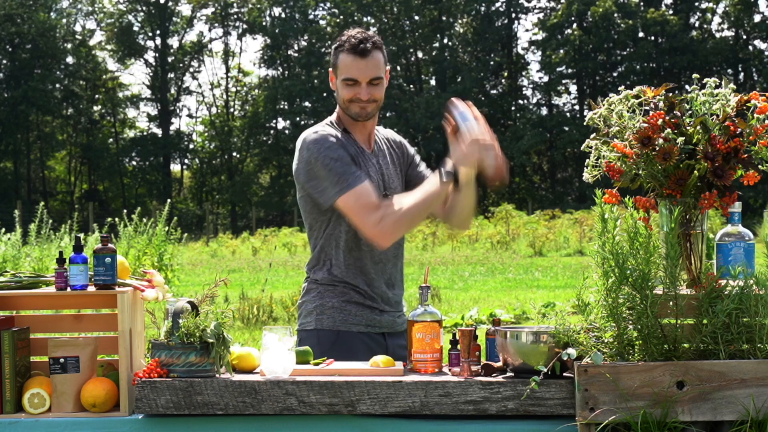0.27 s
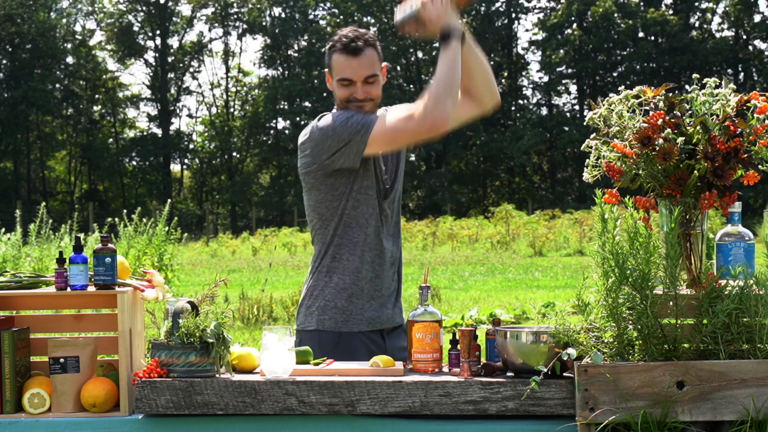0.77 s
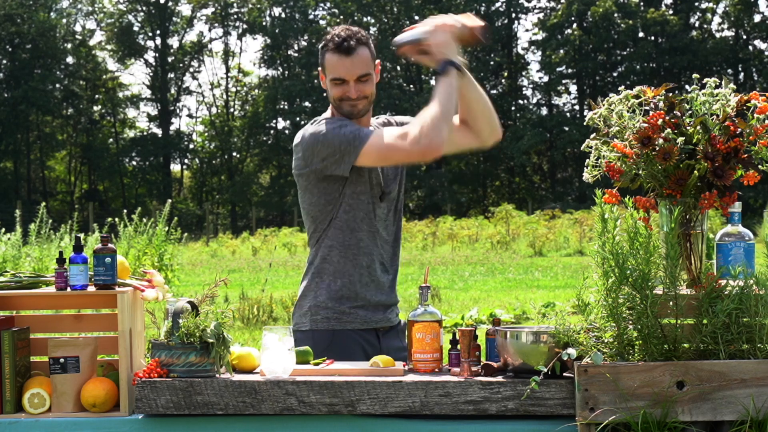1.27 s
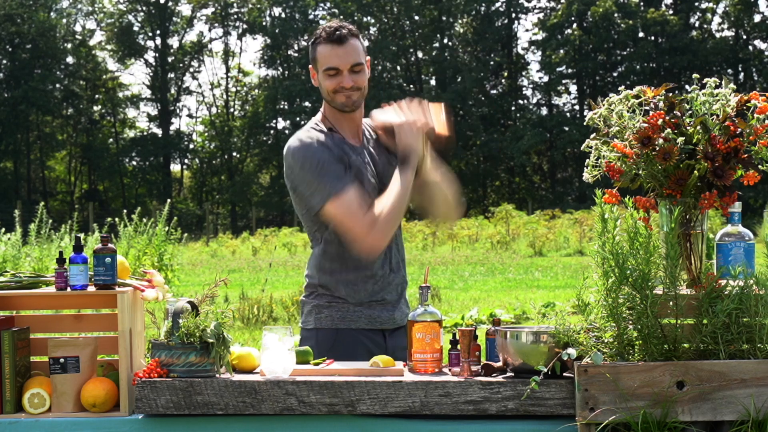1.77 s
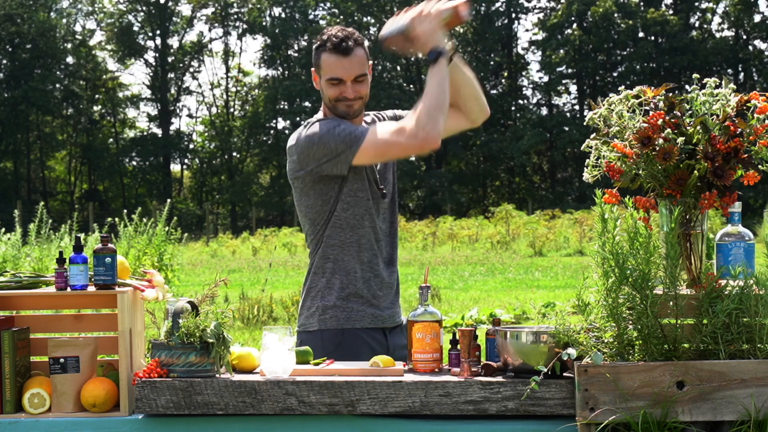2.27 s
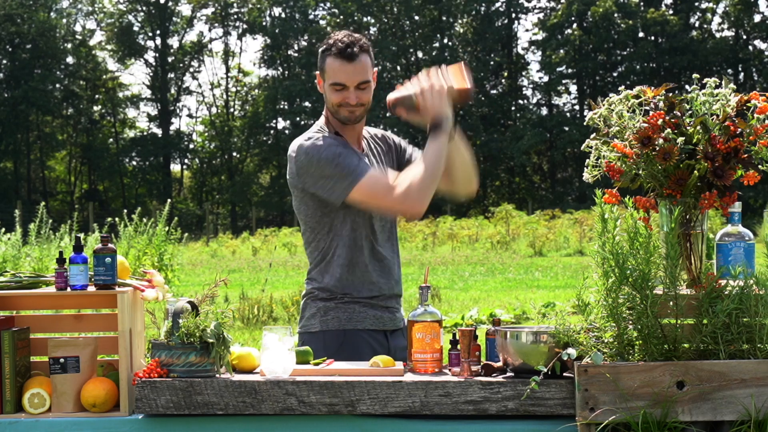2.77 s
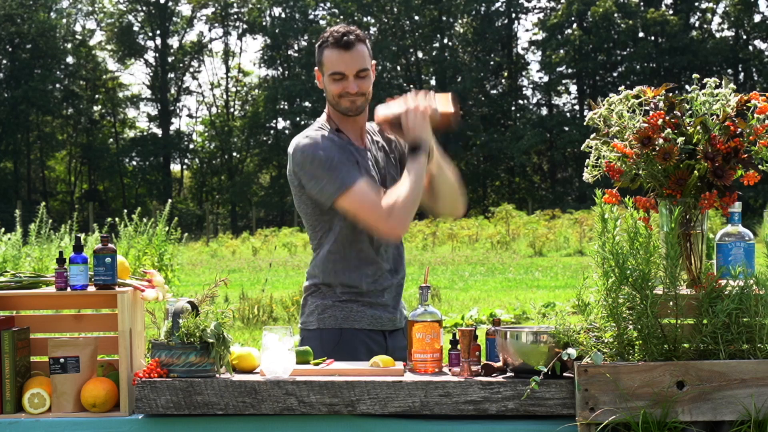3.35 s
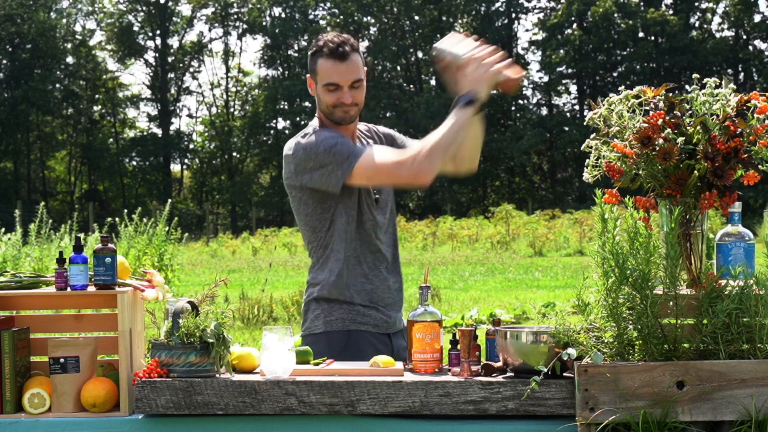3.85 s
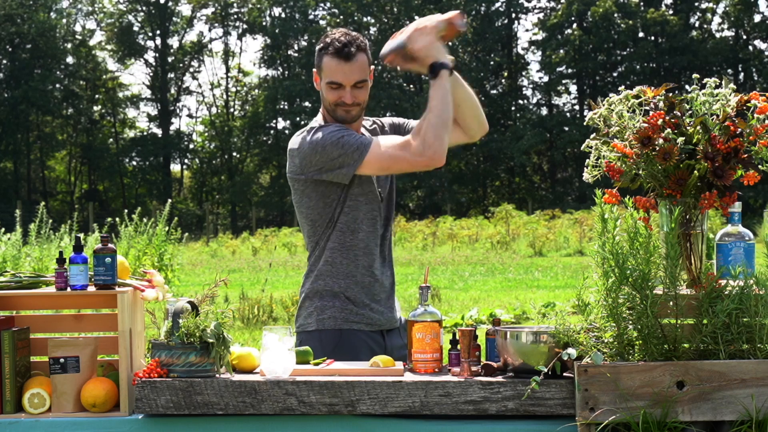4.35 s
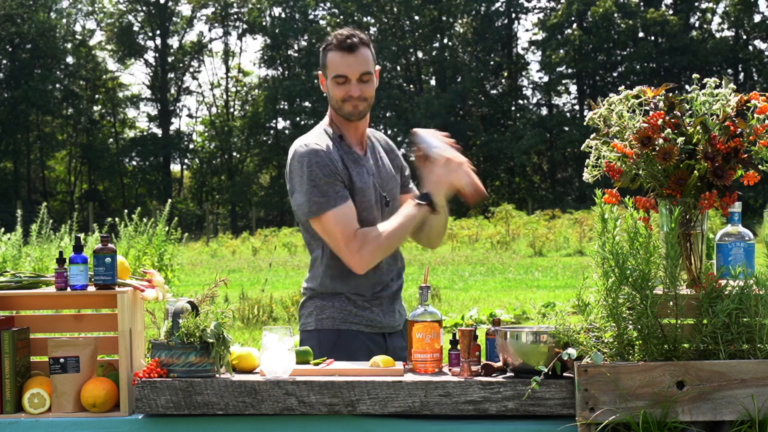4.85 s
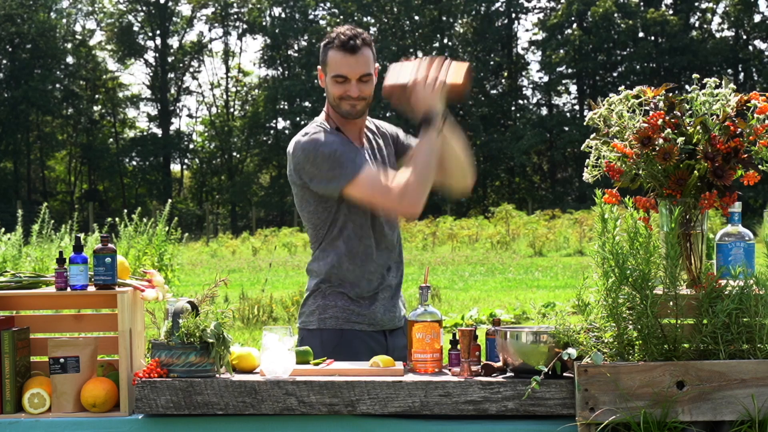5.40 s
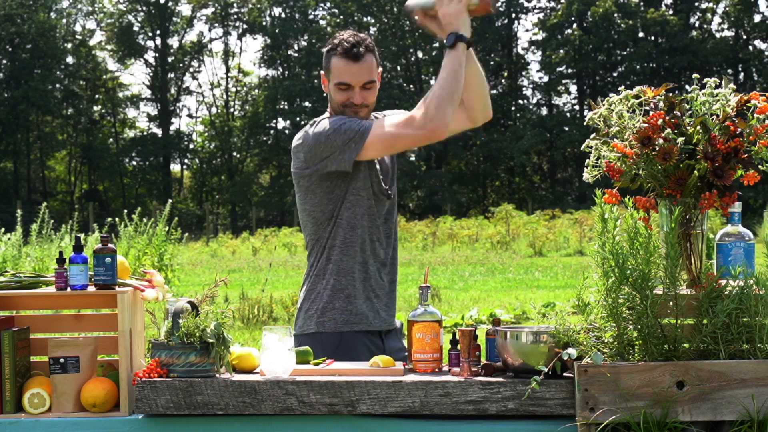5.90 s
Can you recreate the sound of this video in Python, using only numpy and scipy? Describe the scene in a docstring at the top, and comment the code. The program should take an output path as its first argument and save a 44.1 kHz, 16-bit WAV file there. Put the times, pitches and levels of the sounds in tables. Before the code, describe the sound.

Vigorous cocktail shaking in the open air: ice clatters crisply on steel while liquid slaps and churns, about four shakes a second.

```python
"""Ice and liquid are shaken hard in a steel cocktail shaker outdoors, to and fro about four times a second.
Each end of a throw sets off a surge of shaped random grains: liquid slaps and churns, cubes clatter.
Decaying sines give the short hollow ring of the air pocket, whose pitch moves as the liquid shifts.
Dull liquid thuds and hand-damped steel clinks stand out; faint body rumble and open air lie beneath."""
import sys
import numpy as np
from scipy import signal
from scipy.fft import rfft, irfft, next_fast_len
from scipy.io import wavfile
from scipy.ndimage import uniform_filter1d, map_coordinates

SR = 44100
rng = np.random.default_rng(int(sys.argv[2]) if len(sys.argv) > 2 else 0)


def persist_wave(psi):
    """Save psi, clipped to +-1, as 16-bit WAV."""
    counts = np.round(np.clip(psi, -1, 1) * 32767).astype(np.int16)
    wavfile.write(sys.argv[1], SR, np.atleast_2d(counts).T)


N = 270333

# hardest slams on the air pocket: (time [s], level before a common 2 dB lift [dB], pocket pitch [Hz])
SLAMS = [(0.3213, -13, 1520), (0.6185, -8.5, 1465), (0.7811, -19.5, 1886), (0.8726, -14.5, 1310),
         (1.0284, -12, 1410), (1.1263, -8.5, 1490), (1.2444, -11.5, 1640), (1.2697, -15, 1610),
         (1.33, -14, 1370), (1.6735, -11.5, 1440), (1.951, -8.5, 1465), (2.086, -15, 1720),
         (2.223, -16, 1730), (2.9146, -17, 1560), (3.1607, -16, 1490), (3.2855, -11, 1580),
         (3.4299, -8, 1430), (3.5463, -13, 1560), (3.7077, -13.5, 1460), (3.8252, -13, 1480),
         (3.8442, -10.5, 1620), (4.115, -9.5, 1590), (4.8727, -19, 1590), (5.3236, -10, 1664),
         (5.7517, -14.5, 1660), (5.8871, -4.5, 1590), (5.902, -7, 1590), (6.0867, -6, 1620)]
# colour of ice on wet steel: (frequency [Hz], relative gain [dB])
STEEL_COLOUR = [(1200, -30), (2400, -11), (3100, -13), (4150, -10), (4800, -1), (5200, 0), (5800, -4),
                (7000, -6), (8300, -13), (10700, -10), (15500, -22)]


def throws(times, ice_db, end):
    """Impulsive excitation: power of churn, ring, ice and crunch as the load surges against one end."""
    usual_ice_db = -28
    ring_db_per_db = 0.8554  # a harder throw rings the air pocket more; the churn level stays the same
    halving_db = 43  # a throw this much harder is over in half the time
    usual_s, churn_db, ring_db, crunch_db = end
    force_db = ice_db - usual_ice_db
    length_s = usual_s * 2 ** (-force_db / halving_db)
    levels = (churn_db, ring_db + ring_db_per_db * force_db, ice_db, ice_db + crunch_db)
    return np.array([swells(times, length_s, db) for db in levels])


def swells(peak_s, length_s, db):
    """Incoherent addition: powers of overlapping surges sum, each rising faster than it falls."""
    rise_share = 0.74  # rise time over fall time
    t = np.arange(0, N, 32) / SR  # a coarse time grid is enough for the envelope
    u = (t - peak_s[:, None]) / length_s[:, None]
    u = np.where(u < 0, u / rise_share, u)
    gain = np.reshape(amp(db), (-1, 1)) / np.cosh(np.clip(u, -40, 40))
    return np.interp(np.arange(N) / SR, t, np.sum(gain ** 2, axis=0))


def tumble():
    """Loss of wall contact: power of the same four layers from the loose load, quieter in flight."""
    # slosh of the loose liquid: (time [s], level before random swings [dB])
    slosh_rows = [(0, -27), (0.9, -30.5), (1.7, -33), (2.35, -30.5), (3.6, -31.5), (4.35, -36), (5.35, -31),
                  (5.7, -33), (6.1, -31.5)]
    # lulls while the load flies clear of the walls: (middle [s], length [s])
    flight_rows = [(0.185, 0.051), (0.269, 0.077), (0.584, 0.039), (0.721, 0.045), (0.992, 0.06),
                   (1.206, 0.11), (1.756, 0.019), (2.025, 0.076), (2.177, 0.028), (2.586, 0.061),
                   (2.805, 0.057), (3.368, 0.069), (3.494, 0.055), (3.796, 0.05), (3.914, 0.042),
                   (4.054, 0.04), (4.199, 0.063), (4.468, 0.066), (4.582, 0.042), (4.702, 0.019),
                   (4.816, 0.045), (4.927, 0.087), (5.48, 0.054), (5.691, 0.076), (5.838, 0.051)]
    ring_db, ice_db, crunch_db = -40.5, -40.5, -46.5  # rms outside the flights
    liquid_drop_db, ice_drop_db = -15.5, -6.5  # in the middle of a flight
    t = np.arange(N) / SR
    flying = np.max([np.exp(-(2 * (t - s) / length) ** 2) for s, length in flight_rows], axis=0)
    liquid_dip = liquid_drop_db * flying
    ice_dip = ice_drop_db * flying
    # the loose liquid thins and swells by chance
    slosh_db = np.interp(t, *np.transpose(slosh_rows)) + 2.2 * wobble(rate=24)
    levels = [slosh_db + liquid_dip, ring_db + liquid_dip, ice_db + ice_dip, crunch_db + ice_dip]
    return amp(levels) ** 2


def churn(rate=420, centre_hz=880, scatter=0.48, cycles=9):
    """Bubble resonance: gulps and collapsing air pockets ring a few cycles each, among wet slaps."""
    # colour of the churning liquid: (frequency [Hz], relative gain [dB])
    liquid_colour = [(150, -11.5), (310, -10.5), (480, -5), (1000, 5.5), (1800, 14.5), (2400, -7.5),
                     (3600, -2.5), (7000, -21)]
    times = moments(rate)
    hz = centre_hz * np.exp(scatter * rng.standard_normal(len(times)))
    gulps = unit(grains(times, hz, cycles / hz, attack=0.0002, spread_db=3.5, size=900))
    slaps = patter(rate=130, t60=0.044, spread_db=2)
    return even(coloured(gulps + amp(4) * slaps, liquid_colour), span=0.06)


def hollow(rate=260, t60=0.021):
    """Cavity resonance: small bumps keep the air pocket ringing around its present pitch."""
    times = moments(rate)
    slam_s, _, pocket_hz = np.transpose(SLAMS)
    # light taps ring a little higher than full slams, and the pitch drifts as the liquid moves
    drift = 0.016 + 0.055 * wobble(rate=25)[(times * SR).astype(int)]
    scatter = 0.03 * rng.standard_normal(len(times))
    hz = np.interp(times, slam_s, pocket_hz) * np.exp(drift + scatter)
    taps = grains(times, hz, np.full(len(times), t60), attack=0.00019, spread_db=0.5, size=1100)
    return even(taps, span=0.04)


def clatter():
    """Many-body impact noise: cubes tick and chime over foam fizz; gives wall clatter and finer crunch."""
    crunch_hz = 8300  # crossover between clatter and crunch
    times = moments(rate=1800)
    hz = rng.uniform(2500, 15000, len(times))
    chimes = unit(grains(times, hz, 30 / hz, attack=0.0001, spread_db=7.5, size=600))
    ticks = patter(rate=410, t60=0.0091, spread_db=6.5)
    fizz = rng.standard_normal(N)
    contacts = ticks + amp(-5) * chimes + amp(-3) * fizz
    ice = patchy(coloured(contacts, STEEL_COLOUR), depth_db=2.0)
    ice = even(ice, span=0.045)
    wall = signal.sosfiltfilt(signal.butter(4, crunch_hz, fs=SR, output="sos"), ice)
    return unit(wall), unit(ice - wall)


def patchy(x, depth_db):
    """Spectral variation: every cube has its own colour, as random gains over patches of pitch and time."""
    z = signal.stft(x, nperseg=256)[2]
    field = uniform_filter1d(rng.standard_normal(z.shape), size=6, axis=0)
    field = uniform_filter1d(field, size=16, axis=1)
    return signal.istft(z * amp(depth_db * unit(field)), nperseg=256)[1][:N]


def knocks():
    """Damped cavity resonance: a heavy blow rings the air pocket, with a wet splat."""
    out, t = np.zeros(N), np.arange(SR // 20) / SR
    for s, db, hz in SLAMS:
        pocket = ring(t, hz, t60=0.02, attack=0.00025)
        splat = rng.standard_normal(len(t)) * np.exp(-t / 0.0071)
        blow = pocket + amp(-22) * splat
        add(out, s, amp(db + 2) * blow)
    return out


def thuds():
    """Modal response: a mass of liquid hits the end with a dull two-mode knock of varying pitch."""
    # the liquid lands in one mass: (time [s], level of each mode [dB])
    landing_rows = [(0.6185, -22), (0.781, -29), (1.029, -26), (1.244, -26), (1.329, -29), (2.224, -25.5),
                    (2.602, -31), (3.08, -26), (3.161, -25.5), (3.431, -30), (3.844, -27), (4.641, -23),
                    (5.887, -21)]
    # central mode frequencies: ([Hz], [Hz])
    mode_hz = (561, 848)
    out, t = np.zeros(N), np.arange(SR // 20) / SR
    for s, db in landing_rows:
        modes = [ring(t, hz * np.exp(0.2 * rng.standard_normal()), t60=0.038, attack=0.00034)
                 for hz in mode_hz]
        add(out, s, amp(db) * sum(modes))
    return out


def clinks():
    """Contact damping: a hard cube cracks on the wall; hands choke the steel's ring in milliseconds."""
    # one cube strikes bare steel: (time [s], level before a common 8 dB cut [dB])
    strike_rows = [(0.2094, -1), (0.2235, 0), (0.2314, -1), (0.631, -6.5), (1.028, -8), (1.059, -4),
                   (2.6423, -4), (2.7809, -1), (3.159, -9), (3.3984, -5), (3.4271, 1), (3.4398, 2.5),
                   (4.8796, -2), (4.9166, -4.5)]
    out, t = np.zeros(N), np.arange(SR // 40) / SR
    for s, db in strike_rows:
        wall_hz = 5100 * np.exp(0.015 * rng.standard_normal())
        wall = ring(t, wall_hz, t60=0.0026, attack=0.0018)
        crack = coloured(rng.standard_normal(len(t)) * np.exp(-t / 0.002), STEEL_COLOUR)
        blow = wall / np.abs(wall).max() + crack / np.abs(crack).max()
        add(out, s, amp(db - 8.0) * blow)
    return out


def bumps():
    """Low-frequency excitation: movement of the arms and grip gives a dull, brief rumble."""
    # soft low bumps: (time [s], rms level at the top [dB], upper edge [Hz])
    bump_rows = [(0.26, -41.5, 100), (3.16, -40, 194)]
    t = np.arange(N) / SR
    out = np.zeros(N)
    for s, db, edge_hz in bump_rows:
        low_pass = signal.butter(4, edge_hz, fs=SR, output="sos")
        rumble = signal.sosfilt(low_pass, rng.standard_normal(N))
        out += amp(db) * unit(rumble) * np.exp(-np.abs(t - s) / 0.033)
    return out


def open_air():
    """Stationary ambient noise: a faint, mostly low random sound."""
    # colour of the open air: (frequency [Hz], relative gain [dB])
    air_colour = [(70, -2.5), (108, -0.5), (145, -11), (1500, -17), (12000, -76)]
    return amp(-54.0) * unit(coloured(rng.standard_normal(N), air_colour))


def ring(t, hz, t60, attack):
    """Damped harmonic oscillation with a soft start; t60 is the time to decay by 60 dB [s]."""
    return np.sin(2 * np.pi * hz * t) * np.exp(-np.log(1000) * t / t60) * (1 - np.exp(-t / attack))


def grains(times, hz, t60, attack, spread_db, size):
    """Superposition: small contacts of random strength, each at its own pitch for up to size samples."""
    k = np.arange(size)
    strength = amp(spread_db * np.clip(rng.standard_normal(len(times)), -2, 2))
    strength = strength * rng.choice([-1, 1], len(times))
    waves = strength[:, None] * ring(k / SR, hz[:, None], t60[:, None], attack)
    places = (times * SR).astype(int)[:, None] + k
    return np.bincount(places.ravel(), waves.ravel(), N)[:N]


def patter(rate, t60, spread_db):
    """Shot noise: short bursts of very unequal force at random moments, rms 1."""
    times = moments(rate)
    force = amp(spread_db * np.clip(rng.standard_normal(len(times)), -2, 2))
    blows = np.bincount((times * SR).astype(int), force ** 2, N)
    # each blow adds energy that decays by 60 dB in t60
    energy = signal.lfilter([1], [1, -np.exp(-2 * np.log(1000) / (t60 * SR))], blows)
    return unit(np.sqrt(energy) * rng.standard_normal(N))


def moments(rate):
    """Uniformly random instants, rate a second on average."""
    return rng.uniform(0, N / SR, int(rate * N / SR))


def wobble(rate):
    """Spline interpolation: a smooth random curve, rate knots a second."""
    return map_coordinates(rng.standard_normal(int(N * rate / SR) + 4), [np.arange(N) * rate / SR])


def coloured(x, points):
    """Minimum-phase filtering: a causal filter whose gain follows the (Hz, dB) points."""
    m = 2 * next_fast_len(len(x) // 2 + 4096)
    hz, db = np.transpose(points)
    log_hz = np.log(np.fft.rfftfreq(m, 1 / SR) + 1)
    cepstrum = irfft(np.log(amp(np.interp(log_hz, np.log(hz), db))))
    # folding the cepstrum onto positive times makes the filter causal
    cepstrum[1:m // 2] *= 2
    cepstrum[m // 2 + 1:] = 0
    return irfft(rfft(x, m) * np.exp(rfft(cepstrum)))[:len(x)]


def even(x, span):
    """Level equalisation: about rms 1 over stretches of span seconds, keeping the fine grain."""
    size = max(int(span * SR), 8)
    power = uniform_filter1d(uniform_filter1d(x * x, size), size)
    return x / np.sqrt(np.abs(power) + 1e-12)


def unit(x):
    """Normalisation to rms 1."""
    return x / np.sqrt(np.mean(x ** 2) + 1e-20)


def amp(db):
    """Logarithmic level: decibels to amplitude gain."""
    return 10 ** (np.asarray(db) / 20)


def add(track, s, sound):
    """Linear superposition: mix a sound into the track at s seconds."""
    start = min(max(round(s * SR), 0), N)
    track[start:start + len(sound)] += sound[:N - start]


def scene():
    """Free field: throws at cap and base drive liquid, air pocket and ice, with no walls to answer."""
    # packed ice thrown at the cap, then back at the base:
    # (time at the cap [s], time on to the base [s], ice level at the cap [dB], ice level at the base [dB])
    shake_rows = [(0.02, 0.11, -31.5, -31), (0.222, 0.1, -20.0, -22.5), (0.415, 0.1, -31.5, -37),
                  (0.635, 0.16, -22, -30), (1.041, 0.096, -23.5, -21), (1.234, 0.095, -27.0, -33.5),
                  (1.582, 0.13, -31.5, -33.5), (1.835, 0.12, -22, -21.5), (2.023, 0.13, -23.5, -34.5),
                  (2.409, 0.098, -32, -37.5), (2.626, 0.11, -22.5, -21.5), (2.787, 0.16, -25, -39),
                  (3.168, 0.17, -30, -32.5), (3.427, 0.12, -18.5, -27), (3.835, 0.17, -21, -30.0),
                  (4.128, 0.12, -20, -29), (4.311, 0.17, -31, -37.5), (4.657, 0.14, -33.5, -32),
                  (4.883, 0.11, -24.5, -24.5), (5.059, 0.13, -31, -56), (5.282, 0.11, -30.5, -31.5),
                  (5.503, 0.12, -22.0, -25), (5.892, 0.12, -31.5, -37), (6.104, 0.096, -23.0, -23.5)]
    # what each end does to a throw of usual force:
    # (swell time [s], churn level [dB], hollow ring level [dB], crunch level relative to the ice [dB])
    cap_end = (0.025, -31, -32, -5.5)
    base_end = (0.025, -36, -26.5, -7)
    s, return_s, cap_db, base_db = np.transpose(shake_rows)
    power = throws(s, cap_db, cap_end) + throws(s + return_s, base_db, base_end) + tumble()
    wall, crunch = clatter()
    load = np.sum(np.sqrt(power) * [churn(), hollow(), wall, crunch], axis=0)
    return (load + knocks() + thuds() + clinks() + bumps() + open_air())[None]


def record(dry):
    """Band limitation: nothing is kept from the limit upwards."""
    top_hz = 15900
    m = next_fast_len(N + SR // 2)
    kept = np.fft.rfftfreq(m, 1 / SR) < top_hz
    return irfft(rfft(dry, m) * kept, m)[..., :N]


dry = scene()
out = record(dry)
persist_wave(out)
```